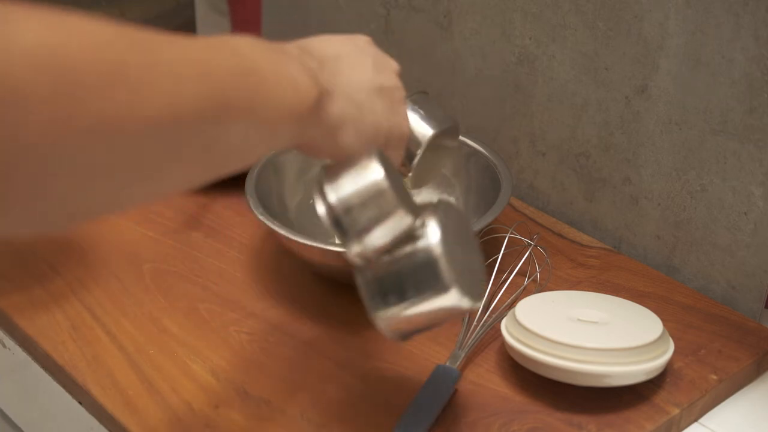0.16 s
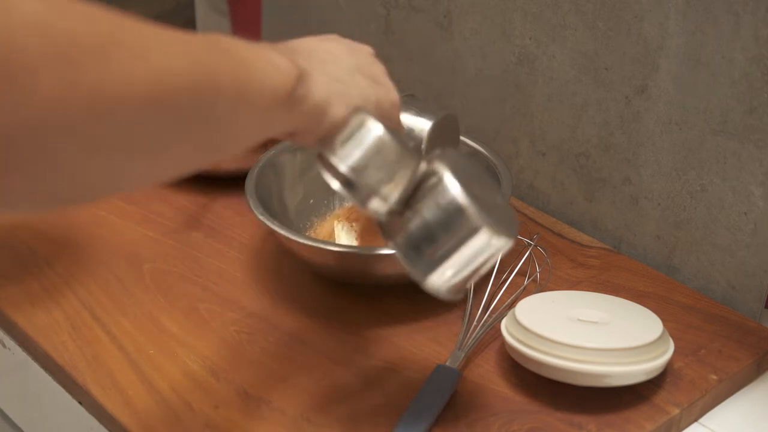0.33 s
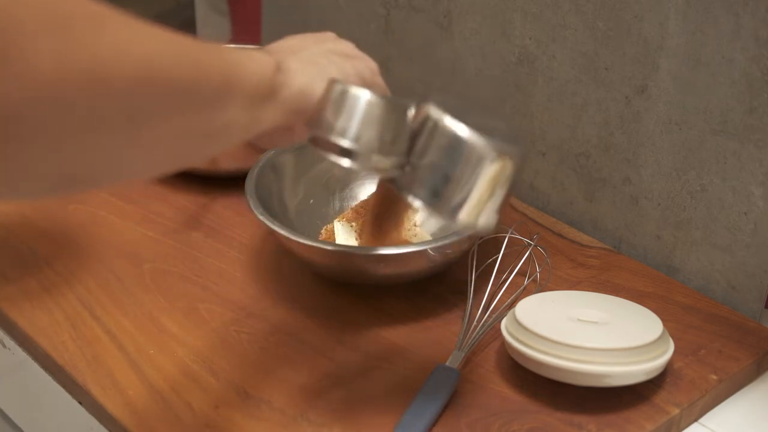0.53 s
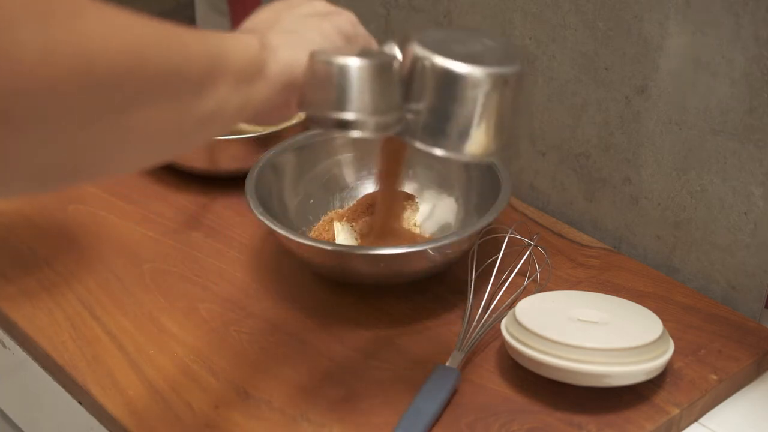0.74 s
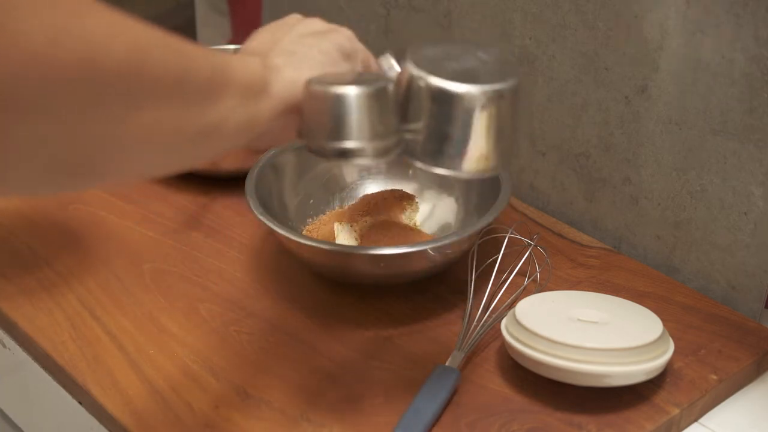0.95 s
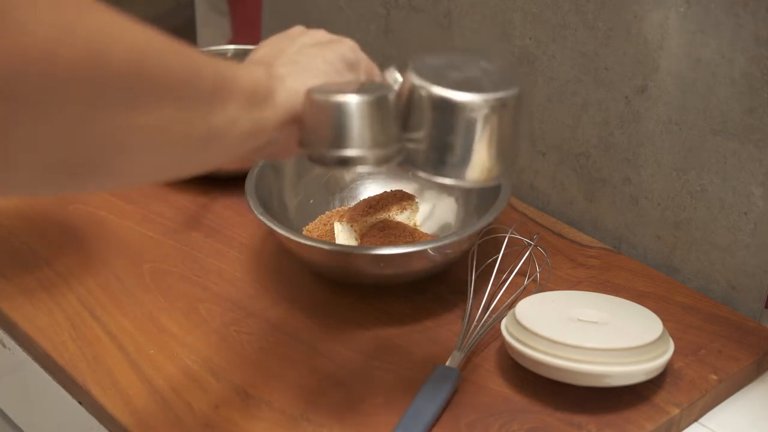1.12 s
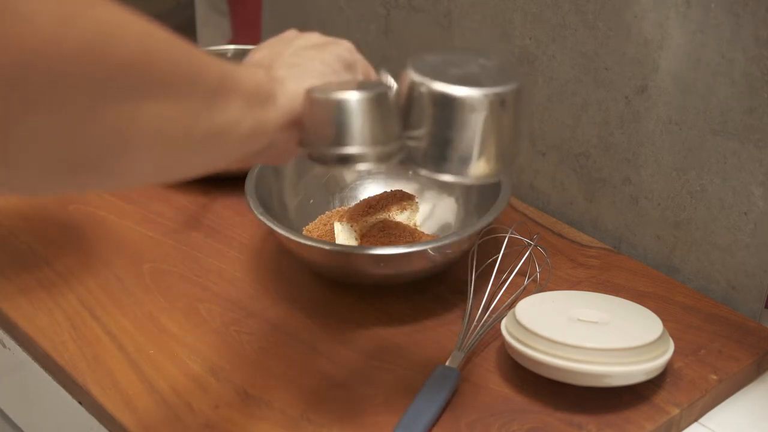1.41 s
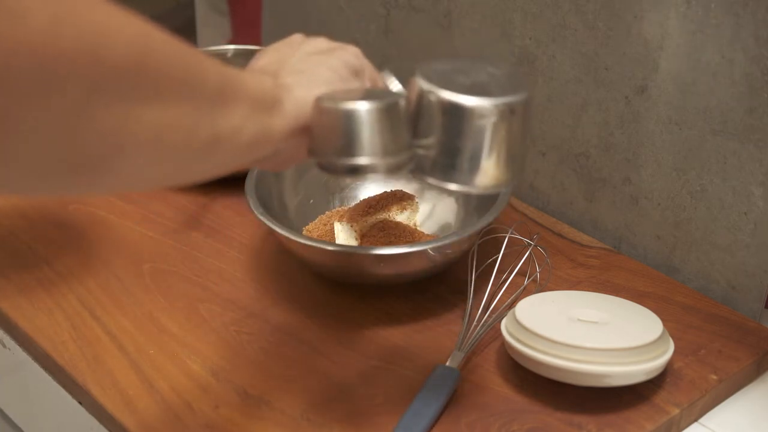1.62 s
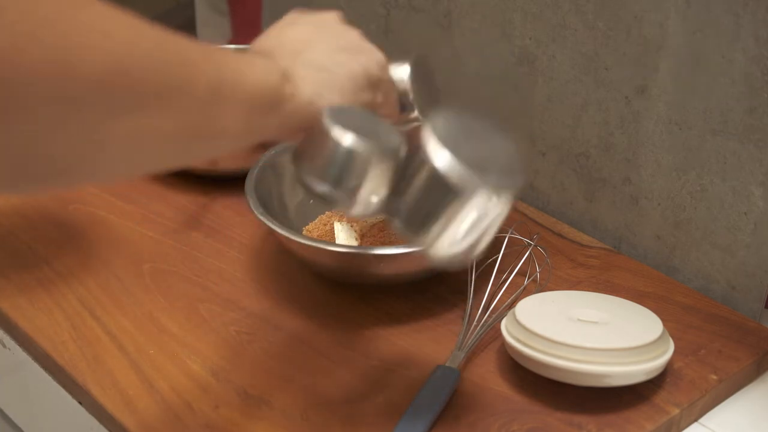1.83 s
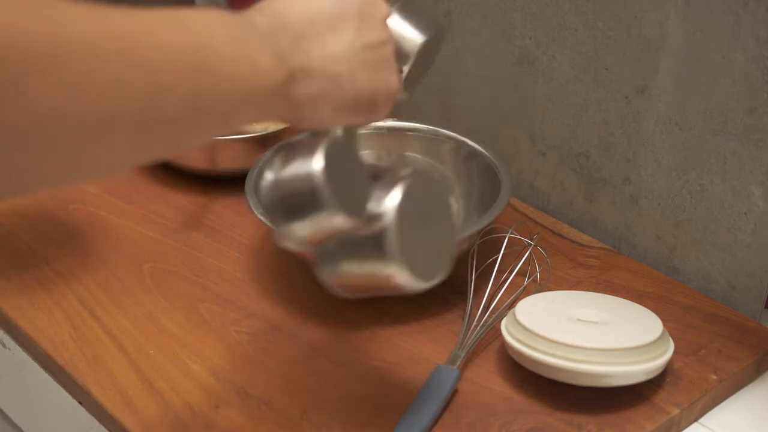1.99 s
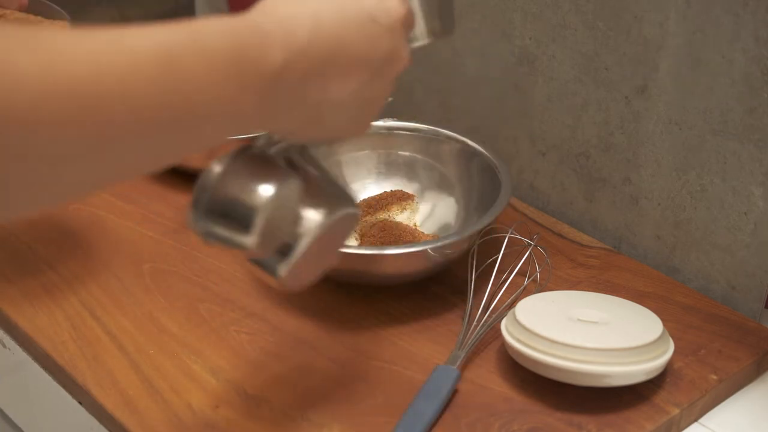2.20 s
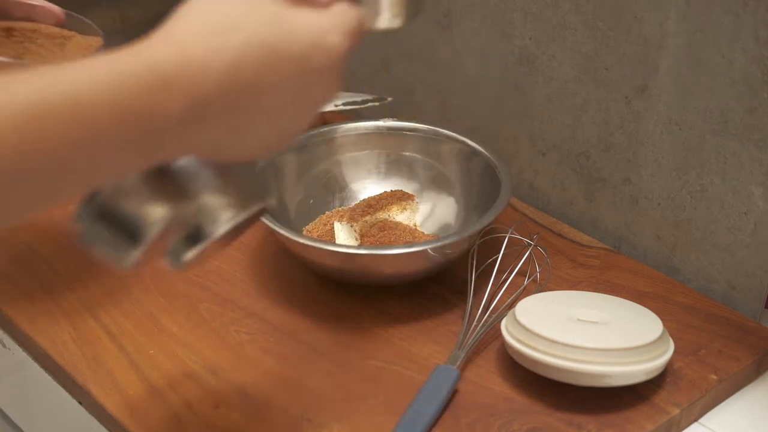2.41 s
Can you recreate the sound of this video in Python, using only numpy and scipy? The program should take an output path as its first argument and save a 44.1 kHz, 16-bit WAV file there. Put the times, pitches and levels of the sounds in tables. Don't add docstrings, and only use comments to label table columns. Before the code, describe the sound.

Sugar pours into a steel mixing bowl from 0.2 seconds, a sharp grainy rush peaking near 0.35, a duller second gush around 0.65 and a brief one at 0.92. A soft heap slumps with a fizz at 1.0. Steel cups clink at 1.5 and 1.64, hollow fingertip knocks follow at 1.8 and 1.98, then another soft slump at 2.1. Low kitchen hum and airy hiss continue throughout, close up.

```python
import sys
import numpy as np
from scipy import signal
from scipy.fft import rfft, irfft, next_fast_len
from scipy.io import wavfile
from scipy.ndimage import map_coordinates

SR = 44100
rng = np.random.default_rng(int(sys.argv[2]) if len(sys.argv) > 2 else 0)


def file_out(sig):
    cols = np.atleast_2d(sig).T
    lim = np.clip(cols, -1, 1)
    pcm = np.round(lim * 32767).astype(np.int16)
    wavfile.write(sys.argv[1], SR, pcm)


def rack_gain(trim_db):
    fader = np.asarray(trim_db, float)
    return 10 ** (fader / 20)


N = 112454
T = np.arange(N) / SR


def unit(x):
    return x / np.sqrt(np.mean(x ** 2) + 1e-20)


def along(points, hz):
    f, v = np.transpose(points)
    return np.interp(np.log(hz + 1), np.log(f + 1), v)


def colour(points):
    return lambda f: rack_gain(along(points, f)) * (f > points[0][0] / 2)


def filtered(x, response):
    m = next_fast_len(len(x) + SR // 4)
    return irfft(rfft(x, m) * response(np.fft.rfftfreq(m, 1 / SR)), m)[:len(x)]


def modes(peaks):
    def response(f):
        total = 0
        for k, (centre, width, db) in enumerate(peaks):
            drag = 1j * f * width
            total = total + (-1) ** k * rack_gain(db) * drag / (centre ** 2 - f ** 2 + drag)
        return total
    return response


def wobble(rate):
    return map_coordinates(rng.standard_normal(int(N * rate / SR) + 4), [T * rate])


def grains(per_s, size_db):
    size = rack_gain(size_db * np.minimum(rng.exponential(size=N), 3))
    hits = (rng.random(N) < per_s / SR) * rng.standard_normal(N) * size
    late_s = 0.004
    return unit(filtered(hits, lambda f: np.exp(-4j * np.pi * late_s * np.sqrt(1000 * f) * (f > 0))))


def ring(table, t, rise_s, scatter_db):
    total = 0
    for hz, db, t60 in table:
        fade = rack_gain(db + rng.normal(0, scatter_db) - 60 * t / t60)
        total = total + fade * np.sin(2 * np.pi * hz * t)
    return (1 - np.exp(-t / rise_s)) * total


# (frequency [Hz], level [dB per Hz])
RUMBLE = [(20, -15), (45, -6), (66, -13), (85, -9), (105, -3), (128, -4), (170, -10), (330, -17)]
# (frequency [Hz], level [dB])
MOTOR = [(46, -14), (103, 1), (487, -15)]
# (time [s], level [dB])
HUM = [(0.0, -44.5), (0.39, -44.5), (1.16, -42), (1.91, -41), (2.55, -40)]
# (frequency [Hz], level [dB per Hz])
AIR = [(150, -3), (250, -2.5), (700, -6.5), (1500, -8), (3300, -7), (6500, -12), (10000, -21), (15800, -33)]
# (time [s], level [dB])
DRAFT = [(0.0, -48.5), (0.26, -46), (0.38, -46.5), (.65, -46), (.8, -46.5), (.95, -45.5), (1.57, -46.5),
         (2.33, -43), (2.55, -44.5)]


def kitchen():
    hum = unit(filtered(rng.standard_normal(N), colour(RUMBLE + [(600, -46.5)])))
    for hz, db in MOTOR:
        turns = np.cumsum(hz + 4 * wobble(14)) / SR
        hum += rack_gain(db + 2.2 * wobble(12)) * np.sin(2 * np.pi * turns)
    air = unit(filtered(rng.standard_normal(N), colour(AIR)))
    hum_db = np.interp(T, *np.transpose(HUM)) + 0.9 * wobble(4.6)
    air_db = np.interp(T, *np.transpose(DRAFT)) + 2.5 + 0.81 * wobble(4.94)
    return rack_gain(hum_db) * hum + rack_gain(air_db) * air


# (time [s], level [dB], middle wall tones over the rest [dB], deep tone over the rest [dB])
GUSHES = [
    [(.205, -57, -6, -8), (.212, -36, 2, -3), (.228, -40, -3, -16), (.238, -29.5, 1, -7.5),
     (.275, -34, 1, -10), (.332, -23.5, -3, -14), (.345, -16, -5, -23), (.41, -28, -6, -18.5),
     (.54, -40.5, -1.5, -24)],
    [(.54, -39.5, -1.5, -15), (.62, -36, -2.5, -11), (.63, -33, -0.5, -35), (.648, -26.5, -3.5, -42),
     (.66, -28, -9, -40), (.669, -23.5, -9, -37), (.7, -28, -10, -43), (.73, -36, -8, -38),
     (.87, -48.5, -10, -35)],
    [(.87, -51, -11, -25), (.885, -42, -11, -25), (.914, -35, -13, -25), (.918, -25, -19, -11),
     (.93, -35, -8, -16), (.945, -36.5, -9, -25), (.97, -50, -12, -27)],
]
# (frequency [Hz], width [Hz], level [dB])
WALL_LOW = [(2290, 36, -13), (2680, 40, -10), (2900, 120, -7), (3030, 90, -2), (3165, 24, 2),
            (4450, 120, -7), (4670, 80, -2), (4800, 70, -5), (5176, 28, -5), (6380, 60, -11)]
# (frequency [Hz], width [Hz], level [dB])
WALL_LOADED = [(2690, 70, -3), (2860, 160, -6), (2990, 90, -2), (3740, 140, -8), (4080, 60, -8),
               (4350, 130, 0), (4560, 200, -2), (4745, 110, -1), (5090, 60, -8), (6160, 110, -7)]
# (frequency [Hz], width [Hz], level [dB])
WALL_HIGH = [(7265, 40, 2), (7375, 40, 3), (7487, 30, 5), (7870, 60, -2), (8160, 40, -1), (8600, 70, 0),
             (8910, 50, 0), (9470, 80, -2), (9820, 70, -1), (10240, 70, 0), (11745, 50, -4),
             (12924, 40, -4), (14100, 60, -8), (14500, 80, -6)]
# (frequency [Hz], level [dB per Hz])
BODY_LOW = [(900, -40), (1400, -16), (2500, -14), (3080, 0), (3500, -13), (4100, -11), (4650, -1),
            (5400, -12), (6800, -12), (8000, -40)]
# (frequency [Hz], level [dB per Hz])
BODY_HIGH = [(4800, -18), (6800, -7), (7300, 3), (10200, 1.5), (11200, -2), (13500, 0.5), (15000, -4.5),
             (15800, -1)]
# (frequency [Hz], width [Hz], level [dB])
DEEP = [(1560, 380, 0), (1400, 220, -2), (1900, 400, -3)]
# (start [s], end [s])
DEEP_SINK = (0.32, 0.366)


def pour():
    hits = grains(14000, 2.5) * rack_gain(0.29 * wobble(60.4))
    low_ring_db, high_ring_db = 1, -7
    loaded_pitch = 0.95

    def through(drive, response):
        return filtered(drive * hits, response) / np.std(filtered(hits, response))

    def dense(drive, points):
        return filtered(drive * hits[::-1], colour(points)) / np.std(filtered(hits, colour(points)))

    def deep_empty(f):
        return modes(DEEP[::2])(f) ** 2

    def deep_loaded(f):
        return modes(DEEP[1:])(f) ** 2

    sunk = np.interp(T, DEEP_SINK, [0, 1])
    out = np.zeros(N)
    for k, gush in enumerate(GUSHES):
        s, level_db, low_db, deep_db = np.transpose(gush)
        flow = rack_gain(np.interp(T, s, level_db)) * (T >= s[0]) * (T < s[-1])
        low = flow * rack_gain(np.interp(T, s, low_db) - 4.5)
        deep = flow * rack_gain(np.interp(T, s, deep_db) - 5 * k)
        wall, body = WALL_LOW, BODY_LOW
        if k > 0:
            wall, body = WALL_LOADED, [(hz * loaded_pitch, db) for hz, db in BODY_LOW]
        out += dense(low, body) + rack_gain(low_ring_db) * through(low, modes(wall))
        out += dense(flow, BODY_HIGH) + rack_gain(high_ring_db) * through(flow, modes(WALL_HIGH))
        out += through(deep * (1 - sunk), deep_empty) + through(deep * sunk, deep_loaded)
    return out


# (time [s], level [dB], frequency [Hz])
TICKS = [(.339, -19, 9000), (.357, -20, 6000), (.37, -15, 8060), (.584, -31, 5000), (.627, -29, 9000),
         (0.646, -25, 4500), (0.665, -18, 7500), (.881, -41, 12000), (.9165, -27, 10000),
         (1.482, -46, 11000),
         (1.797, -52, 7000),
    (2.415, -51, 13000),
    (2.428, -53, 13000),
]


def ticks():
    out = np.zeros(N)
    for s, db, hz in TICKS:
        puff = rng.standard_normal(N) * (T > s) * rack_gain(-60 * np.abs(T - s) / 0.058)
        out += rack_gain(db) * filtered(puff, modes([(hz, 4000, 0)]))
    return out


# (peak time [s], level [dB], rise [s], fall [dB per s], thud level [dB])
HEAPS = [
    (0.99, -27.5, 0.053, 51.5, -34.5),
    (2.107, -28, 0.051, 56.5, -40.5),
]
# (frequency [Hz], level [dB per Hz])
HEAP = [(200, -8.5), (500, -7.5), (1500, -1), (3500, 2.5), (6000, -2.5), (9000, -8.5), (13000, -19.5),
        (15800, -22)]
# (frequency [Hz], level [dB per Hz])
THUD = [(90, -24), (140, 14), (400, 15), (900, 5), (2000, -17.5)]
# (frequency [Hz], width [Hz], level [dB])
PILE = [(213, 17, -9), (388, 22, 10), (806, 77, 0), (1070, 95, 7), (1480, 330, 0.5)]


def heaps():
    rise_db, hold_s = 17, 0.035
    thud_rise_s, thud_fall = 0.045, 1.4
    pile_db = 2.5
    hiss = grains(16000, 2) * rack_gain(0.6 * wobble(40))
    fizz = unit(filtered(hiss, colour(HEAP)))
    dull = filtered(fizz, lambda f: 1 / (1 + 1j * f / 5000) ** 2)
    bright = fizz - dull
    lumps = grains(4300, 0.59)
    thud = unit(filtered(lumps, colour(THUD))) + rack_gain(pile_db) * unit(filtered(lumps, modes(PILE)))
    out = np.zeros(N)
    for s, db, rise, fall, thud_db in HEAPS:
        before = np.clip(s - T, 0, None)
        after = np.clip(T - s - hold_s, 0, None)

        def shape(up, down):
            return rack_gain(-rise_db * before / up - down * after)

        out += rack_gain(db) * (shape(rise, fall) * dull + shape(rise, 1.3 * fall) * bright)
        out += rack_gain(thud_db) * shape(thud_rise_s, thud_fall * fall) * thud
    return out


# (time [s], peak level [dB], small cup level [dB], crack level [dB])
CLINKS = [
    (1.5115, -14.5, 3, 4),
    (1.6366, -15, 5.5, -1),
]
# (time [s], level [dB])
KNOCKS = [
    (1.795, -5.5),
    (1.9798, -11),
]
# (frequency [Hz], level [dB], time to fall 60 dB [s])
CUPS = [(2305, -20, .2), (2627, -14, .09), (5626, -16, .12), (5825, -6, .09), (6040, -8, .06),
        (6293, -19, .14), (6433, -19, .1), (6810, -15, .08), (7700, -10, .06), (8240, -12, .04),
        (9300, -27, .11), (11570, -27, .11), (13930, -28, .1), (15680, -30, .08)]
# (frequency [Hz], level [dB], time to fall 60 dB [s])
HOLLOW = [(1160, -20.5, 0.093), (1427, -9, 0.035), (1660, -5.5, 0.03), (1790, -28, 0.37),
          (1950, -17.5, 0.1), (3500, -22, 0.08), (3620, -17, .03), (4100, -23, 0.08), (4770, -19, 0.08),
          (5000, -15, .03), (5960, -8, 0.035), (8560, -15, 0.05), (8780, -20, .06)]
# (frequency [Hz], level [dB per Hz])
CRACK = [(800, -22), (1600, 2), (2800, -10), (5000, -6), (5600, -7), (5950, 6), (6500, -8), (15500, -17)]
# (frequency [Hz], level [dB], time to fall 60 dB [s])
CAVITY = [(1480, 0, .023), (1390, -18, .04), (1620, -20, .04), (1860, -38, .4), (3720, -28, .04),
          (4110, -39, .15)]
# (resonances (frequency [Hz], width [Hz], level [dB]), level [dB], time to fall 60 dB [s])
AFTERGLOW = ([(1547, 82, 1), (1895, 130, -1)], -34.5, 0.55)


def cups():
    out, t = np.zeros(N + SR), np.arange(SR // 2) / SR
    for s, db, hollow_db, crack_db in CLINKS:
        crack = unit(filtered(rng.standard_normal(len(t)), colour(CRACK)))
        crack = rack_gain(-8 + crack_db - 60 * t / 0.042) * crack
        large = ring(CUPS, t, 0.00031, 0.63)
        small = rack_gain(hollow_db) * ring(HOLLOW, t, 0.001, 2.2)
        out[round(s * SR):][:len(t)] += rack_gain(db - 5) * (large + small + crack)
    for s, db in KNOCKS:
        out[round(s * SR):][:len(t)] += rack_gain(db) * ring(CAVITY, t, 0.003, 0.53)
    resonances, glow_db, glow_t60 = AFTERGLOW
    murmur = unit(filtered(rng.standard_normal(N), lambda f: modes(resonances)(f) ** 2))
    glow = np.zeros(N)
    for row in CLINKS + KNOCKS:
        s, db = row[:2]
        glow += rack_gain(db + glow_db - 60 * np.abs(T - s) / glow_t60) * (T > s)
    return out[:N] + glow * murmur


# (frequency [Hz], time to fall 60 dB [s])
ROOM = [(500, 1), (3000, 0.99), (12000, 0.1)]


def room(x):
    hz, t, z = signal.stft(rng.standard_normal(SR // 2), SR, nperseg=256)
    fade = rack_gain(-60 * t / along(ROOM, hz)[:, None])
    tail = signal.istft(z * fade, SR, nperseg=256)[1]
    delayed = np.pad(x, (400, 0))
    return signal.fftconvolve(delayed, tail / np.linalg.norm(tail))[:N]


def scene():
    struck = cups()
    room_db = -17
    mono = kitchen() + pour() + ticks() + heaps() + struck + rack_gain(room_db) * room(struck)
    return np.array([mono, mono])


# (time [s], low edge [Hz], high edge [Hz], level [dB])
FILLS = [
    (2.17, 4500, 7800, -37),
    (2.475, 4100, 5400, -53),
    (1.313, 7000, 9000, -54),
]


def fills():
    out = np.zeros(N)
    for s, lo, hi, db in FILLS:
        swell = np.cos(np.clip((T - s) / 0.02, -1, 1) * np.pi / 2) ** 2
        hiss = unit(filtered(rng.standard_normal(N), lambda f: (f > lo) & (f < hi)))
        out += rack_gain(db) * swell * hiss
    return out


def band_limit(x):
    return signal.sosfilt(signal.butter(12, 16660, fs=SR, output="sos"), x)


def record(dry):
    top_hz, edge_hz = 15780, 25
    mono = filtered(dry[0], lambda f: (1 - np.tanh((f - top_hz) / edge_hz)) / 2)
    side = fills()
    return band_limit(np.array([mono + side, mono - side]))


dry = scene()
out = record(dry)
file_out(out)
```